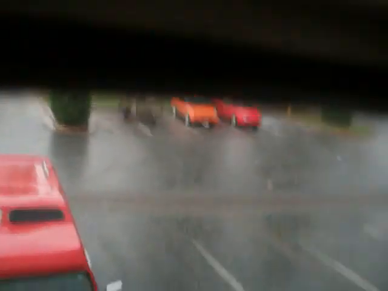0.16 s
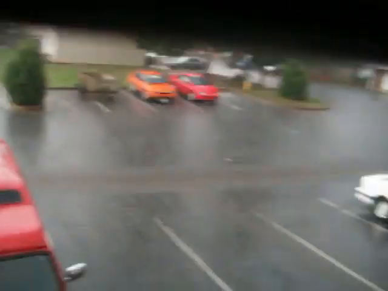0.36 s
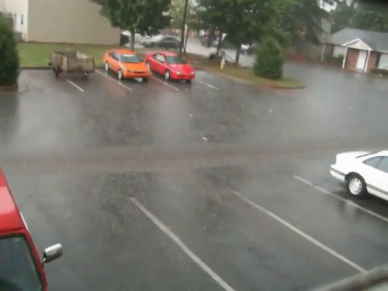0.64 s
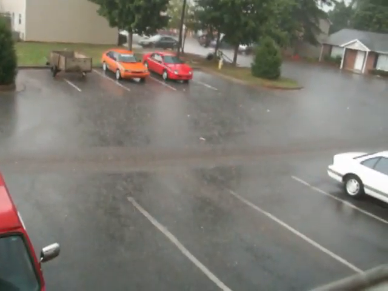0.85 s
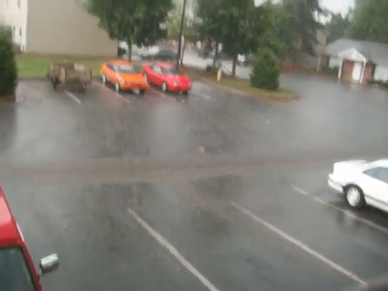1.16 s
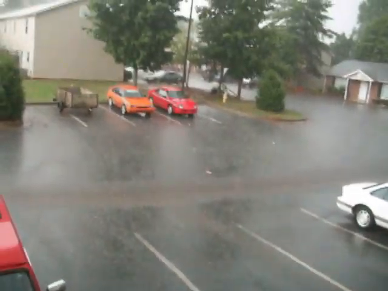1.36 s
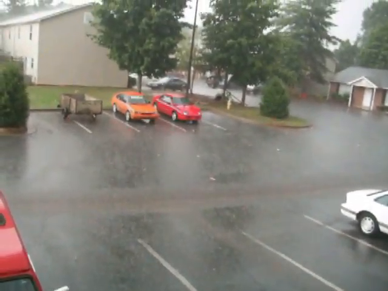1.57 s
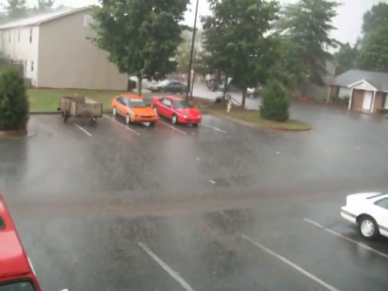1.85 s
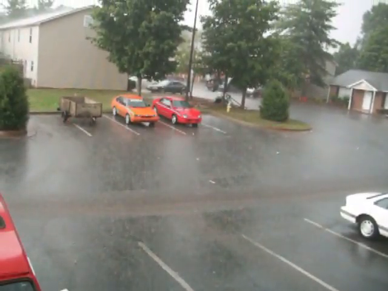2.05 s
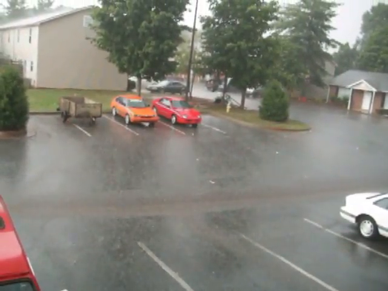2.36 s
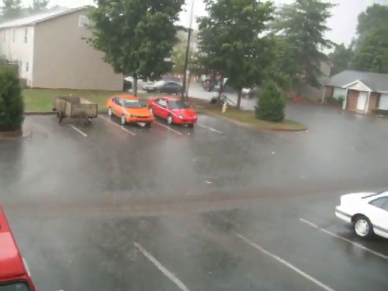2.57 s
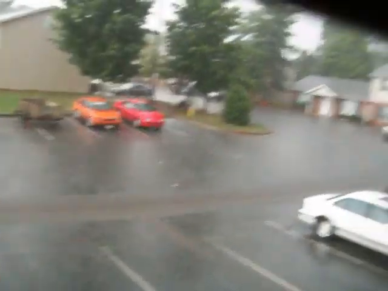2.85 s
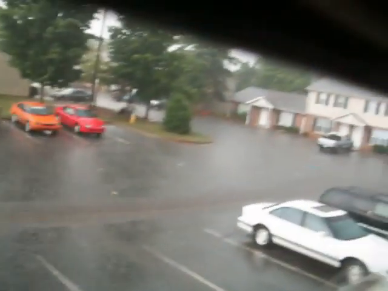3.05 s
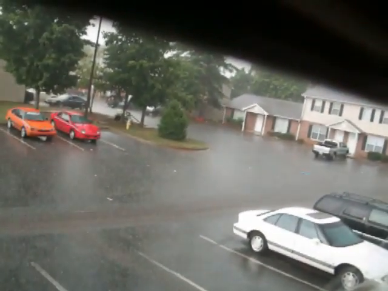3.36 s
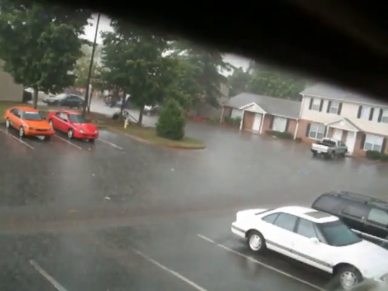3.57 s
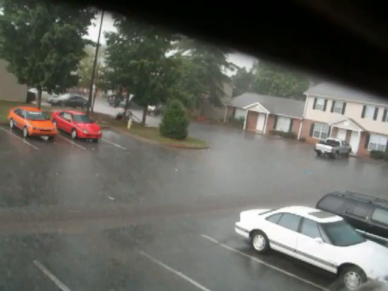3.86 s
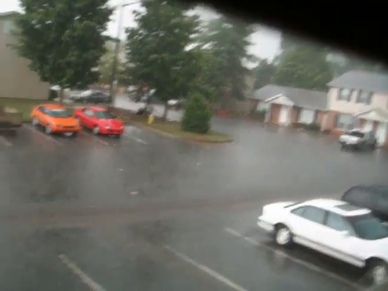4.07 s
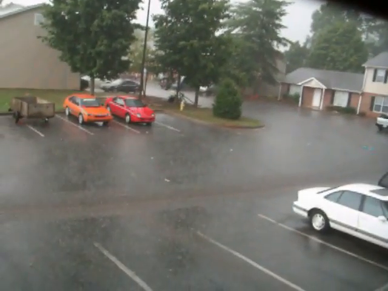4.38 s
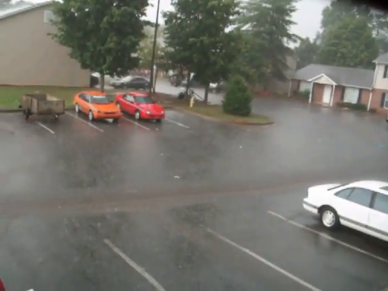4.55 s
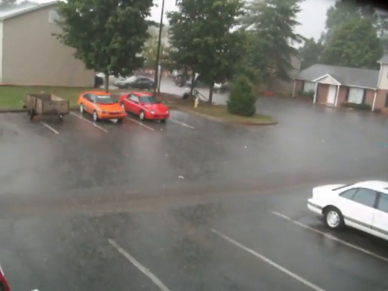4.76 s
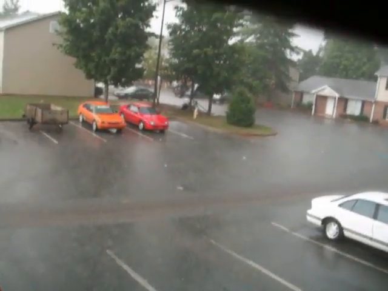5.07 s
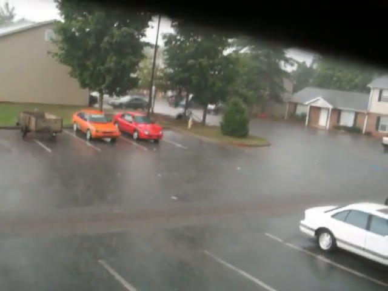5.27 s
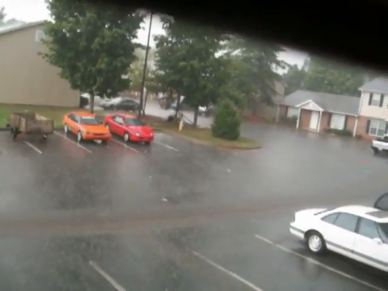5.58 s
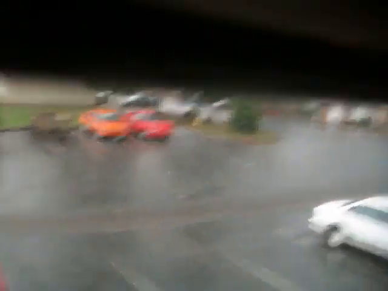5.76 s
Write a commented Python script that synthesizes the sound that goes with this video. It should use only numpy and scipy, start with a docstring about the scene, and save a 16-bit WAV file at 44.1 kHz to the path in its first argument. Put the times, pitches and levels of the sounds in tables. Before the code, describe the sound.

From an open window, a small hand-held microphone picks up a continuous wash of heavy rain splashing on asphalt. It opens on a deep, thunder-like rumble that fades and returns in weaker rolls. Bright little drop ticks are scattered throughout, and a fat drip hits the sill twice, the second time harder. Fingers occasionally rustle faintly near the microphone, and the highs are slightly muffled.

```python
"""A wash of heavy rain and a low rumble, as of far thunder, that dies away and rolls on.
Countless drops on a parking lot merge into a dull roar; nearer ones hiss and crackle.
We listen from an open window through a small hand-held camera that dulls the treble.
Now and then the hand rustles on its case, a close drop ticks, or a fat drip knocks on the sill."""
import sys
import numpy as np
from scipy import signal
from scipy.fft import rfft, irfft
from scipy.io import wavfile
from scipy.ndimage import uniform_filter1d

SR = 44100
rng = np.random.default_rng(int(sys.argv[2]) if len(sys.argv) > 2 else 0)


def put_to_file(sound):
    """Save the sound as 16-bit audio at rate SR, in the file named by the first command-line argument."""
    columns = np.atleast_2d(sound).T  # one column per channel
    safe = np.clip(columns, -1, 1)
    whole_steps = np.round(safe * 32767)
    wavfile.write(sys.argv[1], SR, whole_steps.astype(np.int16))


N = 261072
TIME = np.arange(N) / SR

# swell of the rain: (time [s], far roar [relative dB], near splashes and crackle [relative dB])
RAIN_SWELL = [(0, -27, -30.5), (1.699, -25, -31), (2.401, -26, -30), (3.6, -26.5, -32.5), (4.15, -26, -31),
              (4.45, -25, -31), (4.8, -25.5, -30.5), (5.92, -26.5, -31.5)]
# roar of the whole lot: (frequency [Hz], level [relative dB])
ROAR_EQ = [(20, -20.5), (200, 2), (400, -1), (580, -2.5), (800, -1), (1050, -4), (1350, -8.5), (1700, -13),
           (2600, -20.5), (5000, -40.5)]
# hiss of the splashes: (frequency [Hz], level [relative dB])
HISS_EQ = [(500, -22.5), (1200, -7.5), (1700, -5.6), (2100, 3), (2700, 0.5), (3400, 2.5), (3900, 0.5),
           (4700, -0.5), (6500, -6.5)]
# rolls of the rumble: (start [s], hold [s], 60 dB decay [s], deep layer [dB], room boom [dB])
ROLL_CUES = [(0.0, 0.33, 2.36, -20, -16.5), (0.826, 0.2, .25, -33, -25), (1.57, 0.16, .6, -29.5, -39),
             (2.176, 0.12, .8, -37, -25.5), (2.585, 0.41, .6, -28.5, -27), (3.574, 0.15, .35, -24.5, -21.5),
             (3.778, 0.19, .2, -25.5, -24.5), (4.212, .5, 1.1, -27.5, -26),
             (5.427, 0.097, 1.6, -20.5, -26.5)]
# deep layer of the rumble: (frequency [Hz], level [relative dB])
DEEP_EQ = [(15, -16), (30, -11), (46, 1.5), (62, -4), (78, -2), (100, -14), (200, -28.5), (600, -81.5)]
# low resonances of the room: (frequency [Hz], half-width [Hz], level [relative dB])
ROOM_MODES = [(80, 6.9, -5.5), (110.4, 12.8, 0.5), (145.3, 9.3, -4.5), (195, 28, -2), (225, 47, -5.5),
              (240, 19, -1.5), (320, 39, -11), (429, 37, -10)]
# extra bass weight of a loud roll: (frequency [Hz], level [relative dB])
HEFT_EQ = [(55, -30.5), (85, -7.5), (110, 2.5), (140, -7.5), (190, -25), (400, -58.5)]
# the hand shifts on the camera: (start [s], length [s], level [dB])
RUB_CUES = [(0.224, 0.15, -33), (0.336, 0.09, -31), (0.983, 0.22, -37.5), (1.137, 0.19, -33),
            (2.592, 0.16, -31.5), (5.68, 0.15, -34)]
# single close drops: (time [s], level [dB], pitch [Hz])
TICK_CUES = [(0.3706, -18, 4500), (.581, -15.5, 5300), (0.662, -17, 5200), (0.7528, -14, 2540),
             (.7907, -16.5, 5000), (1.0534, -9, 4560), (2.6188, -16, 4000), (4.3298, -16, 5000),
             (4.8081, -13, 5340), (5.4204, -14.5, 4930)]
# fat drips: (time [s], level [dB], sill pitch [ratio], hardness [dB], splash [relative dB])
DRIP_CUES = [(1.174, 5, 0.91, -12, -15), (2.646, 7, 0.98, 6, -7.5)]
# modes of the sill: (frequency [Hz], level [relative dB], 60 dB decay [s])
SILL_MODES = [(442, -15.5, 0.042), (638, 6.5, 0.007), (980, -16, 0.026), (1650, 0.5, 0.0047),
              (3500, -10, 0.0086)]
# spray of a bursting drip: (frequency [Hz], level [relative dB])
SPRAY_EQ = [(300, 12), (1500, 4.5), (4500, 1), (7000, -18), (9000, -41)]
# dull after-rattle of the sill: (frequency [Hz], level [relative dB])
RATTLE_EQ = [(150, -14), (300, 2.5), (480, -1.5), (800, -16), (2000, -18), (6000, -37)]
# treble roll-off of the camera: (frequency [Hz], gain [dB])
CAMERA_EQ = [(4600, -0.5), (5200, -1.5), (5600, -3.5), (6000, -8), (6400, -15), (6800, -24.5), (7100, -31)]


def gain_of(db):
    """Decibels to amplitude."""
    return 10 ** (np.asarray(db) / 20)


def unit_rms(x):
    """Normalises the whole signal to rms 1."""
    return x / np.sqrt(np.mean(x ** 2) + 1e-20)


def steadied(x):
    """Rides the gain to hold noise near rms 1 from moment to moment."""
    return x / np.sqrt(uniform_filter1d(x ** 2, size=7000))


def eq(x, curve):
    """Filters by (frequency [Hz], gain [dB]) points joined on a log-frequency axis."""
    hz, db = np.transpose(curve)
    bins = np.fft.rfftfreq(len(x), 1 / SR)
    bin_db = np.interp(np.log(bins + 1), np.log(hz), db)
    return irfft(rfft(x) * gain_of(bin_db), len(x))


def add(mix, start_s, sound):
    """Mixes a sound in at its cue."""
    part = mix[max(round(start_s * SR), 0):][:len(sound)]
    part += sound[:len(part)]


def patchy(x, depth_db, bins, frames):
    """Lets random patches of the spectrum, bins wide and frames long, swell and fade."""
    spectrogram = signal.stft(x, nperseg=512)[2]
    patches = rng.standard_normal(spectrogram.shape)
    for axis, span in enumerate((bins, frames)):
        patches = uniform_filter1d(patches, span, axis=axis, mode="wrap")
    return signal.istft(spectrogram * gain_of(depth_db * unit_rms(patches)), nperseg=512)[1][:N]


def impacts(per_s, spread_db):
    """Clicks at random moments: most small, a few large."""
    sizes = gain_of(spread_db * np.minimum(rng.exponential(1, N), 5))
    return sizes * rng.choice([-1, 1], N) * (rng.random(N) < per_s / SR)


def tick(hz, cycles):
    """The snap of one drop: a wavelet of very few cycles, centred in its span."""
    t = np.arange(-128, 129) / SR
    return np.exp(-(t * hz / cycles) ** 2) * np.sin(2 * np.pi * hz * t)


def far_rain():
    """Thousands of impacts a second blur into a dull roar over the asphalt."""
    wash = patchy(rng.standard_normal(N), depth_db=0.66, bins=4, frames=16)
    return gain_of(-24.5) * unit_rms(eq(wash, ROAR_EQ))


def splashes():
    """Dense splashing hisses on the wet ground nearby, rising and falling in patches."""
    drops = unit_rms(impacts(per_s=7000, spread_db=4.0))
    wash = gain_of(-0.7) * rng.standard_normal(N)
    spatter = patchy(drops + wash, depth_db=0.4, bins=7, frames=14)
    return gain_of(-30) * unit_rms(eq(spatter, HISS_EQ))


def near_rain():
    """Drops below the window stand out as a fine crackle, spread over twelve pitches."""
    crackle = np.zeros(N)
    for hz in np.geomspace(2200, 6000, num=12):
        crackle += signal.oaconvolve(impacts(per_s=27, spread_db=2.5), tick(hz, cycles=1.0), "same")
    return gain_of(-42) * unit_rms(crackle)


def roll_envelope(rolls, rise_s, rest_db):
    """Each roll rises, holds and dies away on top of a resting level."""
    power = gain_of(rest_db) ** 2
    for start, hold, t60, db in rolls:
        t = TIME - start
        attack = np.clip(t / rise_s, 0, 1)
        decay = gain_of(db - 60 * np.maximum(t - hold, 0) / t60)
        power = power + attack * decay ** 2
    return np.sqrt(power)


def rumble():
    """Deep rolling noise booms in the low resonances of the room; loud rolls turn heavier."""
    hz = np.geomspace(20, 2000, num=300)
    room_power = sum(gain_of(2 * db) / (1 + ((hz - centre) / width) ** 2) ** 2
                     for centre, width, db in ROOM_MODES)
    room_eq = np.c_[hz, 10 * np.log10(room_power)]
    deep, boom, heft = (steadied(eq(rng.standard_normal(N), curve))
                        for curve in (DEEP_EQ, room_eq, HEFT_EQ))
    start, hold, t60, deep_db, boom_db = np.transpose(ROLL_CUES)
    deep_gain = roll_envelope(zip(start, hold, t60, deep_db), rise_s=0.03, rest_db=-30.5)
    # the room takes longer to build up
    boom_gain = roll_envelope(zip(start, hold, t60, boom_db), rise_s=0.07, rest_db=-28.5)
    heft_gain = gain_of(17) * boom_gain ** 2.05  # grows about 2 dB for each dB of boom
    return deep_gain * deep + boom_gain * boom + heft_gain * heft


def hand_rustle():
    """Tiny slips of skin on the case ring one high resonance of the camera."""
    case_eq = [(1000, -14.5), (3600, -17), (4350, -4.0), (4900, -16.5), (6500, -17), (8000, -38)]
    rustle = unit_rms(eq(impacts(per_s=3000, spread_db=0.5), case_eq))
    strokes = np.zeros(N)
    for start, length, db in RUB_CUES:
        add(strokes, start, gain_of(db) * signal.windows.tukey(int(length * SR), 0.6))
    return strokes * rustle


def close_drops():
    """A few drops land right by the microphone, each a single bright tick."""
    track = np.zeros(N)
    for time, db, hz in TICK_CUES:
        snap = tick(hz, cycles=1.2)
        add(track, time - len(snap) / 2 / SR, gain_of(db) * snap)
    return track


def sill_drips():
    """Each drip flattens on the sill with a dead knock and bursts; a harder one rattles it more."""
    contact_s, rattle_peak_s = 0.0006, 0.023
    splash_delay_s, splash_t60_s = 0.0017, 0.012
    track, t = np.zeros(N), np.arange(SR // 4) / SR
    attack = 1 - np.exp(-t / contact_s)
    splash_envelope = attack * gain_of(-60 * t / splash_t60_s)
    rattle_envelope = t / rattle_peak_s * np.exp(1 - t / rattle_peak_s)
    for start, db, pitch, hardness_db, splash_db in DRIP_CUES:
        knock = np.zeros(len(t))
        for hz, mode_db, t60 in SILL_MODES:
            bright_db = hardness_db * min(hz / 2000, 1)  # a harder blow reaches the higher modes
            knock += gain_of(mode_db + bright_db - 60 * t / t60) * np.cos(2 * np.pi * hz * pitch * t)
        spray = unit_rms(eq(rng.standard_normal(len(t)), SPRAY_EQ))
        rattle = unit_rms(eq(rng.standard_normal(len(t)), RATTLE_EQ))
        rattle_db = -26.5 + 0.2 * hardness_db
        add(track, start, gain_of(db) * attack * knock)
        add(track, start + splash_delay_s, gain_of(db + splash_db) * splash_envelope * spray)
        add(track, start, gain_of(db + rattle_db) * rattle_envelope * rattle)
    return track


def scene():
    """A bed of far and near rain swells gently under the rumble and the spot sounds, in mono."""
    times, far_db, near_db = np.transpose(RAIN_SWELL)
    far_swell = unit_rms(gain_of(np.interp(TIME, times, far_db)))
    near_swell = unit_rms(gain_of(np.interp(TIME, times, near_db)))
    bed = far_swell * far_rain() + near_swell * (splashes() + near_rain())
    return (bed + close_drops() + sill_drips() + rumble() + hand_rustle())[None]


def record(dry):
    """The camera dulls the treble; any peak over full scale is flattened, and the sound cuts off at its band
    limit."""
    clipped = np.clip(eq(dry[0], CAMERA_EQ), -1, 1)
    lowpass = signal.firwin(511, cutoff=6900, window=("kaiser", 9), fs=SR)
    return signal.oaconvolve(clipped, lowpass, "same")[None]


dry = scene()
out = record(dry)
put_to_file(out)
```